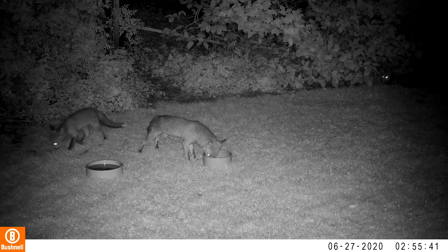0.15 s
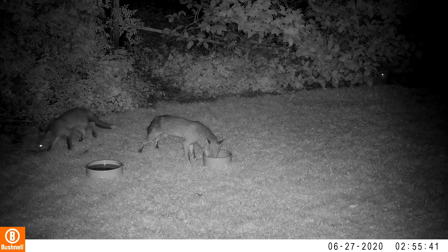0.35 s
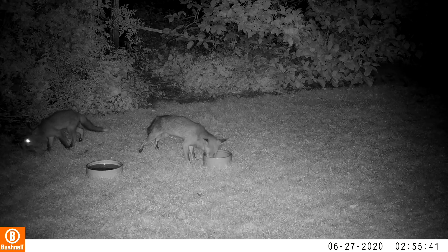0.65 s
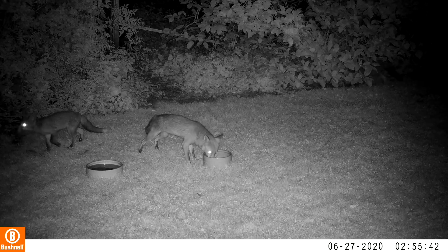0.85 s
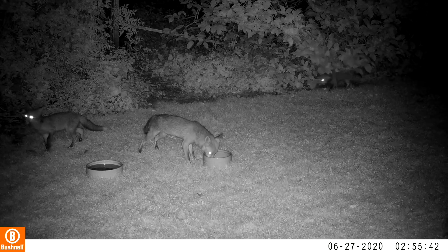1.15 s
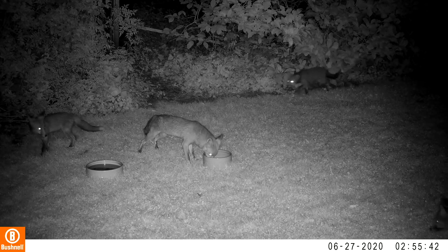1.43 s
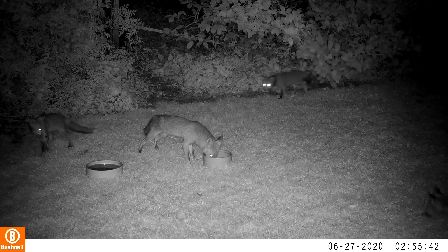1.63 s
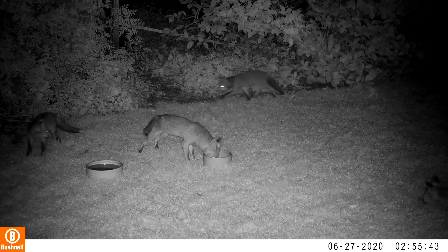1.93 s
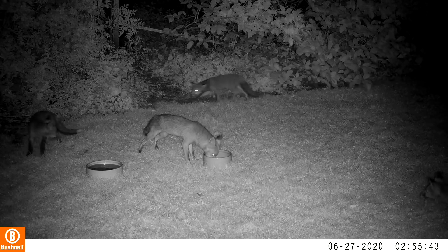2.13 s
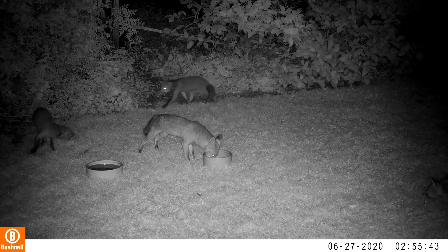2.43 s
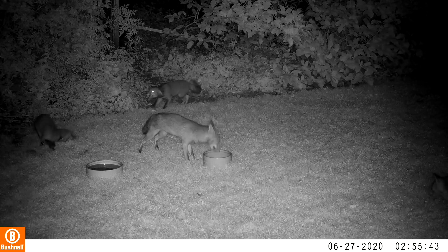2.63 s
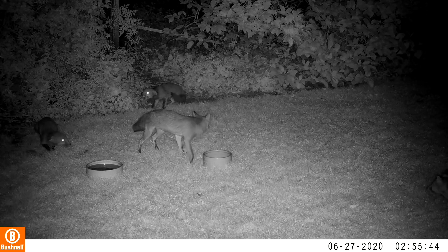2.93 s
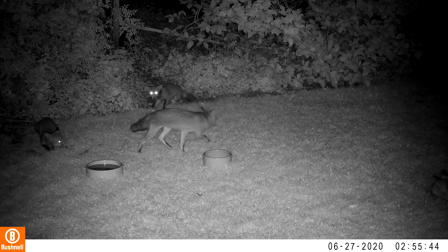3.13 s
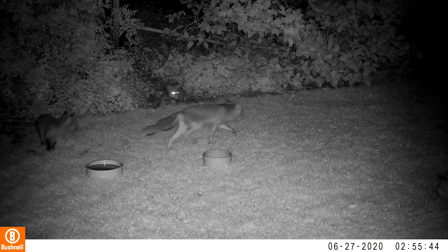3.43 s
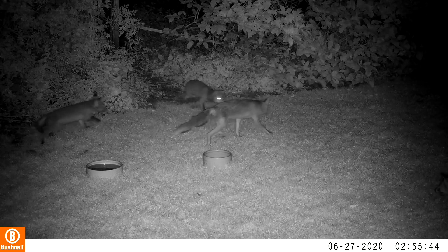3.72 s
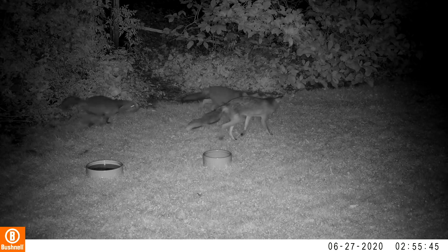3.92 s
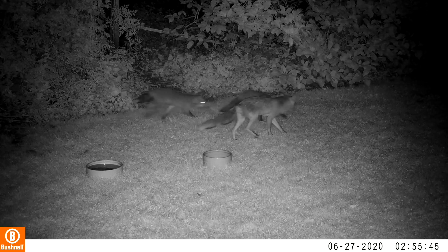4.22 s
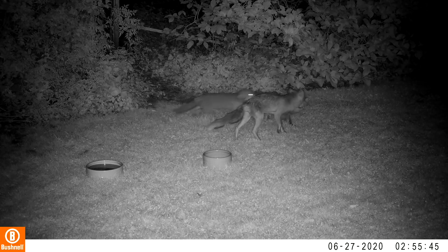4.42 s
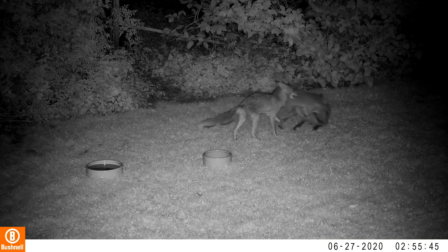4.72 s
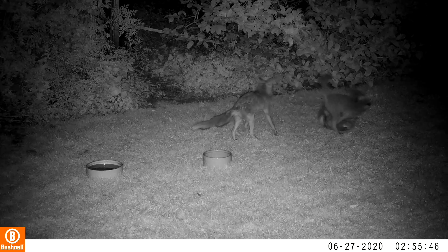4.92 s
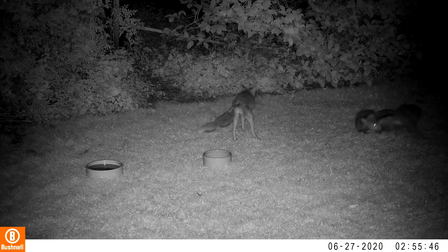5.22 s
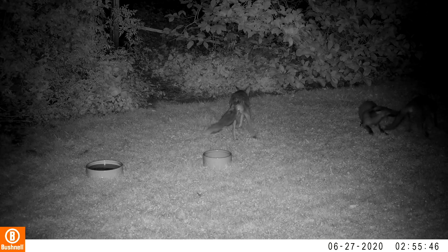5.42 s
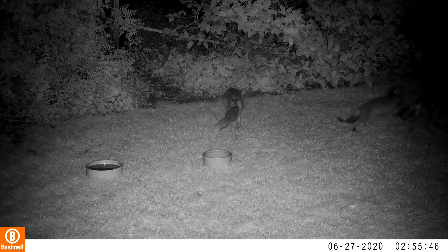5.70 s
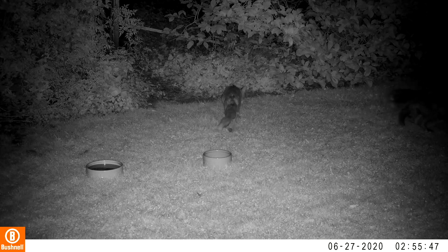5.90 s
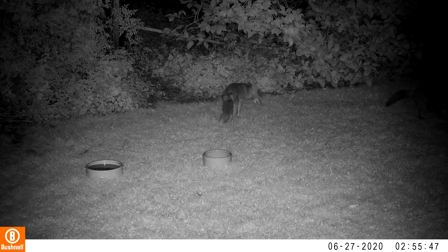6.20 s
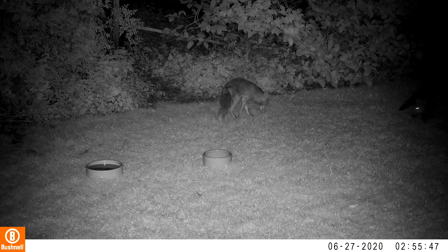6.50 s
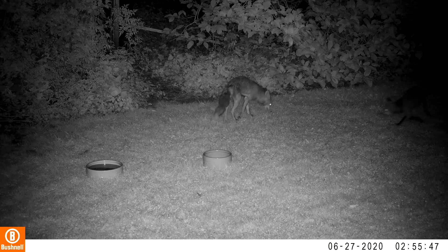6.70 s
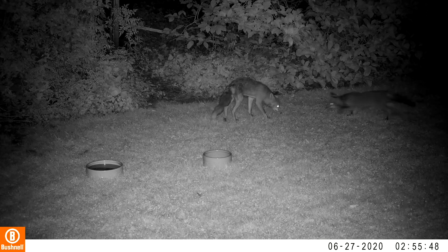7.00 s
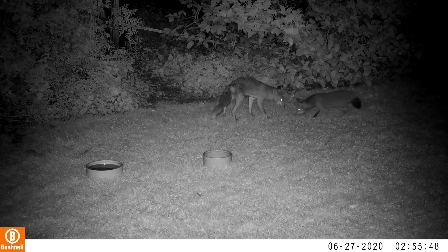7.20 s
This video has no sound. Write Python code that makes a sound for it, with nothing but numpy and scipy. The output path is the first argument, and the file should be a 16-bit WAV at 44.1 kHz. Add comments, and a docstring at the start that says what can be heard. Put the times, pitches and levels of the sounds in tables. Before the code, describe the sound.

A small outdoor camera microphone picks up foxes on a garden lawn at night. Faint whines and a fluttering growl come first, then soft paw thuds, more growls and a slow popping throat rattle. Two sharp yaps burst into harsh, gritty screams that distort. Dry snaps and another rough scream follow, before only grass swishes remain over dull air.

```python
"""Foxes squabble on a lawn at night before a small trail camera, over dull air and brushed grass throughout.
First come soft whines and growls, then paws thudding on turf, then a slow rattle of separate throat pops.
Sharp yaps break into screams, more short calls and dry snaps follow, and striding swishes end the scene.
Each call is a shaky voice and turbulent air ringing throat cavities, chopped by a slow flutter of the throat.
Garden surfaces reflect calls and snaps, and the loudest screams overload the microphone."""
import sys
import numpy as np
from scipy import signal
from scipy.fft import rfft, irfft, next_fast_len
from scipy.io import wavfile
from scipy.ndimage import uniform_filter1d

SR = 44100
rng = np.random.default_rng(int(sys.argv[2]) if len(sys.argv) > 2 else 0)


def to_wav(sig):
    """Store sig (one row per channel, or 1-D mono) as 16-bit WAV at the path in sys.argv[1].

    Samples outside -1..1 are clipped; the rate is SR.
    """
    pcm = np.clip(np.atleast_2d(sig), -1, 1) * 32767
    pcm = np.round(pcm).astype(np.int16)
    wavfile.write(sys.argv[1], SR, pcm.T)  # frames by channels


N = 324135
TIME = np.arange(N) / SR


def amp(db):
    """Decibel law: 20 dB is a factor of ten in amplitude."""
    return 10 ** (np.asarray(db) / 20)


def evened(x):
    """Power normalization: scales to an rms of one."""
    return x / np.sqrt(np.mean(x ** 2) + 1e-20)


def read(points, hz):
    """Interpolation of a spectrum on a logarithmic frequency axis."""
    f, value = np.transpose(points)
    return np.interp(np.log(hz + 1), np.log(f + 1), value)


def add(mix, s, sound):
    """Superposition: sums a sound into the mix from time s."""
    part = mix[max(round(s * SR), 0):][:len(sound)]
    part += sound[:len(part)]


def colour(x, points):
    """Linear filtering: multiplies the spectrum by gains given in dB."""
    size = next_fast_len(len(x) + 2048)
    gain = amp(read(points, np.fft.rfftfreq(size, 1 / SR)))
    return irfft(rfft(x, size) * gain, size)[:len(x)]


def wander(count, hz):
    """Low-pass random process: smooth chance of rms one, moving up to about hz times a second."""
    f = np.fft.rfftfreq(count, 1 / SR)
    return evened(irfft(rfft(rng.standard_normal(count)) * np.exp(-(f / hz) ** 2), count))


def resonate(x, hz, width_hz):
    """Damped resonance: shifts the moving centre hz to zero, smooths there and shifts back."""
    turn = np.exp(2j * np.pi * np.cumsum(hz * np.ones(len(x))) / SR)
    r = np.exp(-np.pi * width_hz / SR)
    return 2 * (turn * signal.lfilter([1 - r], [1, -r], x / turn + 1e-18)).real


def formant(x, hz, width_hz):
    """Cascaded resonance: applied twice, for steep sides."""
    return resonate(resonate(x, hz, width_hz), hz, width_hz)


# the night air: (time [s], mean wash level [dB], mean rumble level [dB])
AIR = [(0, -54.5, -73), (1, -55, -78.5), (1.501, -54, -69), (2.2, -54, -71.5), (2.9, -53, -79.5),
       (4.3, -58, -79), (6.6, -55, -90.5), (7.35, -60.5, -84)]
# spectrum of the dull wash and faint hiss: (frequency [Hz], relative gain [dB])
NIGHT = [(25, -24), (120, -16), (230, -12), (400, -5.5), (600, -1), (850, -0.5), (1500, -12.5), (2500, -25),
         (3600, -29.5), (5800, -45.5), (8000, -44.5), (11000, -35), (15600, -34.5)]
# spectrum of the low rumble: (frequency [Hz], relative gain [dB])
RUMBLE = [(20, 4.5), (60, 6.5), (110, -10.5), (250, -29.5), (1000, -63)]


def night(swell_db=.8, lump_db=3):
    """Filtered noise: a dull wash with the microphone's faint hiss, over a lumpy rumble."""
    s, *columns = np.transpose(AIR)
    wash_db, rumble_db = (np.interp(TIME, s, c) for c in columns)
    wash = evened(colour(rng.standard_normal(N), NIGHT))
    rumble = evened(colour(rng.standard_normal(N), RUMBLE))
    return amp(wash_db + swell_db * wander(N, 17)) * wash + amp(rumble_db + lump_db * wander(N, 10)) * rumble


# feet and fur brushing the grass: (time [s], level between strides [dB])
RUSTLE = [(0, -60), (1.1, -59.5), (1.6, -55), (2.05, -55.5), (2.5, -50), (3.85, -54), (4.3, -55),
          (5.8, -52), (6.55, -53), (7.35, -52.5)]
# single strides swishing through the grass: (time [s], rise over the rustle [dB])
STRIDES = [(6.69, 5.5), (6.86, 2), (7.17, 4.5), (7.3, 4.5)]
# spectrum of the grass: (frequency [Hz], relative gain [dB])
GRASS = [(60, -19.5), (300, -8), (600, -6), (1300, 1), (2800, -3.5), (4000, -13), (5000, -19),
         (7000, -33.5), (16000, -51.5)]
STRIDE_S = 0.036  # from the height of a stride until its rise in dB falls to 1/e


def grass(clump_db=2, blades_per_s=420, blade_db=-9):
    """Friction noise: a clumpy swish with random ticks of blades and leaves, swelling at each stride."""
    ticks = (rng.random(N) < blades_per_s / SR) * rng.standard_normal(N)
    swish = rng.standard_normal(N) * amp(clump_db * wander(N, 40))
    swish += amp(blade_db) * evened(ticks)
    strides_db = sum(db * np.exp(-((TIME - s) / STRIDE_S) ** 2) for s, db in STRIDES)
    return evened(colour(swish, GRASS)) * amp(np.interp(TIME, *np.transpose(RUSTLE)) + strides_db)


def paw(db, hz=95, decay_s=0.0061):
    """Heavily damped oscillation: a soft, low thud on turf, its pitch varied by chance."""
    t = np.arange(4096) / SR
    envelope = t / decay_s * np.exp(1 - t / decay_s)
    octaves = rng.uniform(-.9, .5)
    return amp(db) * envelope * np.sin(2 * np.pi * hz * 2 ** octaves * t)


# paws landing near the camera: (time [s], level before a 1 dB trim [dB])
PAWS = [(1.305, -48), (1.345, -51), (1.395, -52), (1.425, -52), (1.485, -45), (1.534, -40.5), (1.81, -53),
        (1.955, -54), (2.085, -54), (2.29, -61)]


def paws():
    """Superposition of impacts: each landing gives one thud."""
    ground = np.zeros(N)
    for s, db in PAWS:
        add(ground, s, paw(db - 1))
    return ground


# echoes from the camera's post, fence and hedge: (delay [s], gain [dB])
ECHOES = [(.0066, -11.5), (.0087, -15), (0.013, -8.5), (0.0143, -35.5), (.025, -31)]
# decay of the garden's tail: (frequency [Hz], time to fall 60 dB [s])
GARDEN = [(300, 0.1), (1000, 0.32), (2800, 0.3), (5000, 0.27)]


def garden(x, tail_db=-11, build_s=0.012):
    """Reflection and scattering: near echoes, and a short tail from the foliage."""
    hz, t, z = signal.stft(rng.standard_normal(SR // 2), SR, nperseg=256)
    decay = amp(-60 * t / read(GARDEN, hz)[:, None])
    tail = signal.istft(z * decay, SR, nperseg=256)[1]
    tail *= 1 - np.exp(-(np.arange(len(tail)) / SR / build_s) ** 2)
    response = amp(tail_db) * tail / np.linalg.norm(tail)
    for s, db in ECHOES:
        add(response, s, amp([db]))
    return x + signal.fftconvolve(x, response)[:N]


# overall colour of the calls, shared by the snaps: (frequency [Hz], relative gain [dB])
THROAT = [(100, -24), (400, -12), (620, -3), (1000, -4.5), (1400, 2), (2000, 4.5), (3000, 3.5),
          (3800, -1.5), (4400, -4.5), (5000, -13), (6000, -18.5), (7500, -50.5), (16000, -74.5)]


def snap(db, hz, decay_s=0.0037, width_hz=2400):
    """Impulse excitation: a dry click with a very short ring."""
    t = np.arange(1024) / SR
    burst = rng.standard_normal(len(t)) * np.exp(-t / decay_s)
    click = colour(formant(burst, hz, width_hz), THROAT)
    click *= 1 - np.exp(-(t / .0004) ** 2)  # softens the onset
    return amp(db) * click / abs(click).max()


# dry snaps of the scuffle: (time [s], peak level before reflections [dB], ring [Hz])
SNAPS = [(2.5438, -26, 2500), (5.398, -20.5, 3090), (5.8539, -21, 2090), (5.893, -16, 2780),
         (6.295, -34, 2725), (6.6071, -24.5, 2310), (6.621, -45, 2700), (6.804, -40.5, 2700),
         (7.003, -34.5, 2240)]


def snaps():
    """Superposition of impulses: the scuffle's separate clicks."""
    clicks = np.zeros(N)
    for s, db, hz in SNAPS:
        add(clicks, s, snap(db, hz))
    return clicks


def flutter(t, start, rate, smear, open_s=.0016, uneven_db=-1.12, jitter_s=0.0011):
    """Amplitude modulation: the throat pops open each cycle, longer in slow ones; smear keeps it ajar."""
    turns = np.cumsum(rate) / SR - rate[0] * (start - t[0])
    cycle = np.round(turns)
    # each cycle has its own chance size and delay
    size, late = rng.standard_normal((128, 2))[cycle.astype(int) % 128].T
    opening = open_s * np.sqrt(100 / rate)
    pop = np.exp(-(((turns - cycle) / rate - jitter_s * late) / opening) ** 2)
    gate = smear + (1 - smear) * pop * amp(uneven_db * size)
    # expected mean power of the gate, divided out to hold the level
    duty = rate * opening * np.sqrt(np.pi)
    power = smear ** 2 + 2 * smear * (1 - smear) * duty + (1 - smear) ** 2 * duty / np.sqrt(2)
    return pop, gate / np.sqrt(power)


def controls(*tracks):
    """Parametric control: time, effort, flutter, smear, pitch, rasp, mouth, chest as curves or constants."""
    return np.column_stack(np.broadcast_arrays(*tracks))


def cry(rows, waver=0.02103, shake=0.0528, arch=.05, half_db=-10, mouth_width_hz=1550, upper_hz=3750,
        upper_db=-7, chest_hz=900, chest_air_db=-2, leak_db=-24, lead_s=.004):
    """Source and filter: a shaky voice and rasping air ring chest and mouth, chopped by the flutter."""
    s, *columns = np.transpose(rows)
    t = np.arange(s[0] - lead_s, s[-1] + lead_s, 1 / SR)
    effort_db, rate, smear, pitch, rasp, mouth, chest_db = (np.interp(t, s, c) for c in columns)
    smear, rasp, count = np.clip(smear, 0, 1), np.clip(rasp, 0, 1), len(t)
    pop, gate = flutter(t, s[0], rate, smear)
    # each puff of pressure lifts the pitch; a forced voice also shakes fast
    bend = waver * wander(count, 104.8) + shake * rasp * wander(count, 580)
    bend += arch * (1 - smear) * (pop - .7)
    phase = 2 * np.pi * np.cumsum(pitch * (1 + bend)) / SR
    folds = sum(np.cos(k * phase) for k in range(1, 8))
    # alternate cycles differ, which puts weak lines between the harmonics
    folds = folds * (1 + amp(half_db) * wander(count, 200) * np.cos(phase / 2))
    # each cavity has its own turbulence
    air = rng.standard_normal((3, count)) * np.sqrt(SR / 4 / pitch)
    middle, upper, low = (1 - rasp) * folds + rasp * air * amp([[0], [0], [chest_air_db]])
    # rushing air damps the mouth and widens its resonance
    voice = formant(middle, mouth, mouth_width_hz * (0.34 + rasp.mean())) + amp(leak_db) * middle
    voice += amp(upper_db) * formant(upper, upper_hz, width_hz=1150)
    voice += amp(chest_db) * formant(low, chest_hz, width_hz=770)
    voice = colour(voice, THROAT)
    # a running rms of one leaves the level to effort and flutter
    voice /= np.sqrt(uniform_filter1d(voice ** 2, size=200) + 1e-12)
    fade = np.clip(np.minimum(t - t[0], t[-1] - t) / (lead_s / 2), 0, 1)
    return t[0], amp(effort_db) * voice * gate * fade


# short whines and growls, values as held between opening and closing: (start [s], length [s], attack [s],
# release [s], effort [dB], flutter [1/s], smear [0-1], pitch [Hz], closing sag of the pitch [0-1],
# rasp [0-1], mouth resonance [Hz], chest level [dB])
SHORT_CALLS = [ (0.413, 0.063, .03, 0.035, -57.5, 66, .65, 1920, .14, 0.63, 4000, -18),
               (0.453, 0.084, .02, 0.064, -47.5, 50, 1.03, 489.6, 0.05, 0.1, 490, -34),
               (0.527, 0.058, .03, .02, -55, 100, 0.73, 2130, .02, 0.62, 4430, -18),
               (0.528, 0.26, .05, 0.138, -51, 68, 0.93, 530, 0.05, 0.5, 540, -3),
               (.555, 0.092, .015, 0.076, -49, 76, .7, 1270, 0, 0.4, 2520, 4),
               (1.221, 0.27, .075, .11, -33.5, 86, 0.32, 1344, 0.17, 0.49, 2630, -3.5),
               (2.117, 0.21, 0.0032, .12, -35.5, 72, 0.43, 1404, 0, 0.61, 2890, -0.5),
               (2.283, 0.14, 0.0115, 0.086, -35.5, 53, 0.34, 1440, 0.17, 0.39, 2870, 0),
               (3.059, .125, 0.037, .05, -37, 62, 0.54, 1509, 0.53, 0.19, 2650, -2),
               (3.891, 0.081, 0.0279, 0.06, -35, 102, 0.54, 930, 0.2, 0.58, 2760, 13.5),
               (3.982, 0.093, 0.045, .045, -37.5, 34, 0.8, 980, 0, 1, 2300, 13),
               (5.267, 0.11, .003, 0.063, -36, 38, 0.26, 1050, 0.1, 0.94, 2400, 3),
               (5.411, 0.048, 0.00744, 0.036, -28, 51, 0.47, 830, 0.2, 0.62, 2590, -4),
               (5.487, 0.21, .035, 0.042, -24, 101, .38, 1207, 0.2, 0.72, 2610, -13),
               (6.249, .082, 0.0047, 0.029, -24.5, 59.5, 0.3, 720, 0.15, 0.57, 2670, -8.5),
               (6.331, .088, 0.0244, 0.0306, -29, 65.8, 0.23, 1530, .25, 0.46, 2400, -2.5), ]
# as the jaw opens, a call swells, scoops up in pitch and starts with crisp pops [dB, then shares]
SWELL_DB, SCOOP, OPEN_MOUTH, CRISP = 10, .27, 0.033, 0.35
# as it closes, the call fades and moves into the chest [dB, dB, share]
FADE_DB, CLOSE_CHEST_DB, CLOSE_MOUTH = 15.5, 7, 0.069


def short_call(start, length, attack, release, effort_db, rate, smear, pitch, sag, rasp, mouth, chest_db):
    """Articulation: the jaw opens, holds and closes; level, pitch and resonances all follow it."""
    t = np.arange(0, length, .001)
    opening = np.clip(1 - t / attack, 0, 1)
    closing = np.clip(1 - (length - t) / release, 0, 1) ** 1.4
    rows = controls(
        start + t, effort_db - SWELL_DB * opening - FADE_DB * closing, rate, smear * (1 - CRISP * opening),
        pitch * (1 - SCOOP * opening ** 2 - sag * closing), rasp,
        mouth * (1 - OPEN_MOUTH * opening - CLOSE_MOUTH * closing), chest_db + CLOSE_CHEST_DB * closing)
    return cry(rows, upper_hz=3850, upper_db=-9, waver=.022, shake=.055, half_db=-8, leak_db=-25)


# the long rattle: (time [s], effort [dB], flutter [1/s], mouth resonance [Hz])
RATTLE = [(2.582, -41, 57, 2600), (2.612, -33, 57, 2600), (2.622, -31, 44.3, 2500),
          (2.76, -30.5, 44.3, 2080), (2.928, -30.5, 44.3, 2020), (2.938, -31, 59, 2250),
          (3.0, -31, 59, 2500), (3.075, -39, 59, 2600)]


def rattle(first_hz=1000, last_hz=885, smear=0.084, rasp=0.42, wide_rasp=0.69, chest_db=-25,
           wide_chest_db=-14, narrow_hz=2100, wide_hz=2600):
    """Pulsed excitation: slow, separate pops on a sinking pitch, raspier where the mouth is wide."""
    s, effort_db, rate, mouth = np.transpose(RATTLE)
    wide = (mouth - narrow_hz) / (wide_hz - narrow_hz)
    pitch = np.interp(s, s[[0, -1]], [first_hz, last_hz])
    rows = controls(s, effort_db, rate, smear, pitch, rasp + (wide_rasp - rasp) * wide, mouth,
                    chest_db + (wide_chest_db - chest_db) * wide)
    return cry(rows, upper_hz=3350, upper_db=-1, mouth_width_hz=1370, arch=.06, shake=0.0537, waver=0.0213)


# yaps: (start [s], rise [s], first pop [dB], top [dB], fade [dB/s], flutter [1/s], top pitch [Hz])
YAPS = [(4.4438, .04, -60, -17.5, 420, 104, 2414), (4.648, .03, -27.5, -18.5, 547, 99, 2297)]
# after its top a yap breaks to a low, smeared voice and dies away
YAP_BREAK_S, YAP_TAIL_S = 0.022, .05


def yap(start, rise, first_db, top_db, fade_db_per_s, rate, pitch, scoop=.22, drop=.57, smear=0.83,
        rasp=0.48, broken_rasp=0.4, mouth_ratio=1.055, mouth_drop=0.088, chest_db=-22, broken_chest_db=5):
    """Formant tuning: pops climb with the mouth near the pitch; then the voice breaks over an octave down."""
    t = np.arange(0, rise + YAP_TAIL_S, .001)
    early = np.clip(1 - t / rise, 0, 1) ** 2.1
    after = np.maximum(t - rise, 0)
    broken = np.minimum(after / YAP_BREAK_S, 1)
    climb = pitch * (1 - scoop * early)
    effort_db = top_db + (first_db - top_db) * early - fade_db_per_s * after
    rows = controls(
        start + t, effort_db, rate, smear * broken, climb * (1 - drop * broken),
        rasp + (broken_rasp - rasp) * broken, mouth_ratio * climb * (1 - mouth_drop * broken),
        chest_db + (broken_chest_db - chest_db) * broken)
    return cry(rows, upper_hz=3850, upper_db=-4, half_db=-9.5)


# one curve a scream: (time [s], effort [dB], pitch [Hz], mouth resonance [Hz], chest level [dB])
SCREAMS = [
    [(4.757, -35.5, 1666, 1660, -17), (4.795, -23, 1690, 1860, -27), (4.822, -13, 1050, 2040, -8.5),
     (4.85, -13, 1396, 2970, -1.5), (4.88, -13, 1898, 3840, -8), (4.92, -13, 1795, 3440, -13),
     (4.975, -28, 1365, 2690, -5)],
    [(4.99, -25, 1520, 2920, -13.5), (5.028, -15.5, 1465, 2880, -7), (5.055, -15, 1250, 2780, -10.5),
     (5.085, -10.5, 1146, 2260, -13), (5.11, -32.5, 1112, 2250, -10)],
    [(5.105, -20.5, 1743, 3500, -5.5), (5.13, -17.5, 1678, 3370, -2), (5.152, -25, 1624, 1800, -2),
     (5.195, -27, 1462, 1620, 0), (5.23, -24.5, 1234, 1140, 16), (5.268, -29, 1110, 1550, 15)],
    [(5.87, -32, 900, 1880, -24), (5.91, -23, 1014, 2190, -18), (5.965, -19, 946.3, 2600, -18),
     (6.02, -17.5, 1150, 2140, -14), (6.07, -19, 1146, 3560, -6), (6.15, -19, 1185, 3110, -10),
     (6.22, -18.5, 942, 2600, -16.5), (6.236, -23.5, 926, 2600, -15)],
]
# the voice of each scream: (flutter at the start [1/s], smear after the first pops [0-1],
# rasp with the mouth wide [0-1])
SCREAM_VOICES = [(125, .74, .74), (110, .5, .62), (108, .78, .8), (104, .33, .76)]


def scream(curve, rate, smear, rasp, narrow_hz=1600, wide_hz=3000, narrow_rasp=0.71, slowing=.24,
           blur_s=0.059, first_smear=0.47):
    """Forced phonation: pops soon blur together, the flutter slows, and a wider mouth brings more rasp."""
    s, effort_db, pitch, mouth, chest_db = np.transpose(curve)
    t = s - s[0]
    rows = controls(
        s, effort_db, rate * (1 - slowing * t / t[-1]), smear * np.interp(t, [0, blur_s], [first_smear, 1]),
        pitch, rasp * np.interp(mouth, [narrow_hz, wide_hz], [narrow_rasp, 1]), mouth, chest_db)
    return cry(rows, waver=0.02364, shake=0.0397, upper_hz=3690, upper_db=-3, mouth_width_hz=1400,
               chest_hz=883)


def scene():
    """Superposition: calls and snaps with their reflections, over paws, grass and the night."""
    foxes = snaps()
    for row in SHORT_CALLS:
        add(foxes, *short_call(*row))
    add(foxes, *rattle())
    for row in YAPS:
        add(foxes, *yap(*row))
    for curve, voice in zip(SCREAMS, SCREAM_VOICES):
        add(foxes, *scream(curve, *voice))
    return (garden(foxes) + paws() + grass() + night())[None]


# spectrum of what overload takes away: (frequency [Hz], gain [dB])
OVERLOAD = [(30, 1.5), (150, 1), (600, 2), (2000, 4.5), (4200, 6), (5500, -7.5), (7200, -23), (9000, -16.5),
            (11000, -8.5), (13500, -12), (16000, -8)]
# the microphone's knee [amplitude], and the share of any excess that it loses on the upward swing
KNEE, TOP_LOSS = .26, .5
EDGE_HZ = 15800  # upper band limit


def record(dry):
    """Nonlinear distortion: lopsided squashing past the knee adds low splutter and high fizz; then a band limit."""
    x = dry[0]
    lost = (np.clip(x, -KNEE, KNEE) - x) * np.where(x > 0, TOP_LOSS, 1)
    heard = x + colour(lost, OVERLOAD)
    low_pass = signal.firwin(1023, EDGE_HZ, window=("kaiser", 9), fs=SR)
    return signal.oaconvolve(heard, low_pass, "same")[None]


dry = scene()
out = record(dry)
to_wav(out)
```